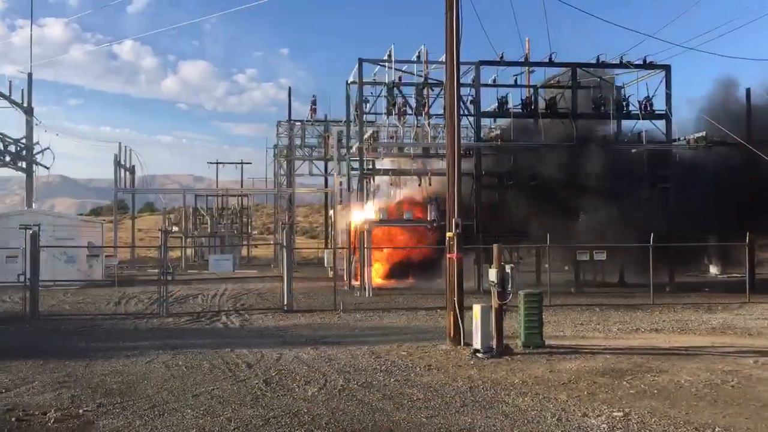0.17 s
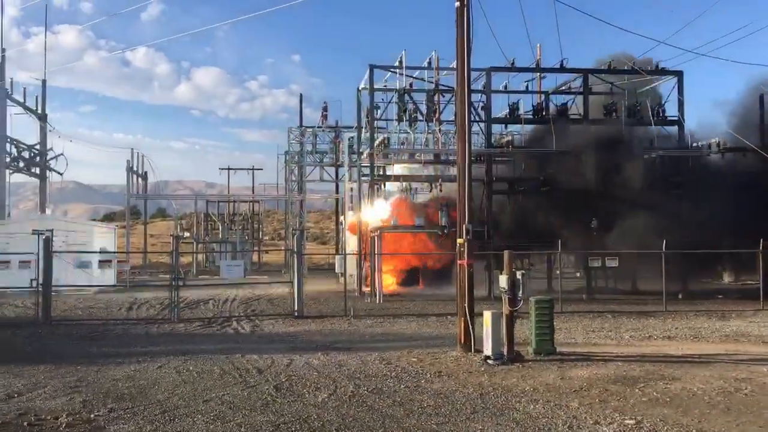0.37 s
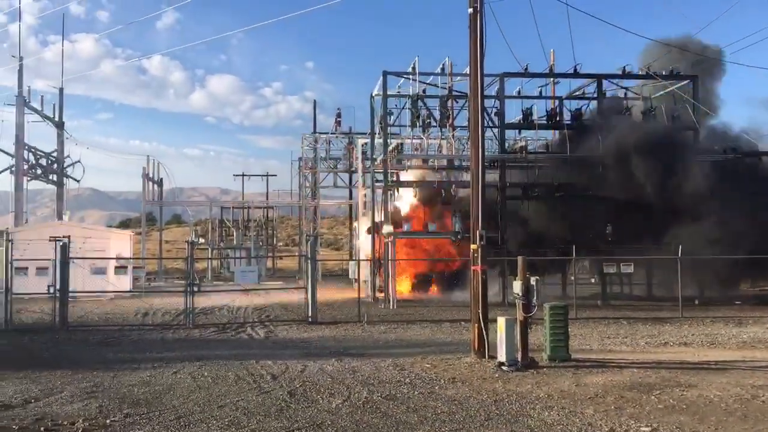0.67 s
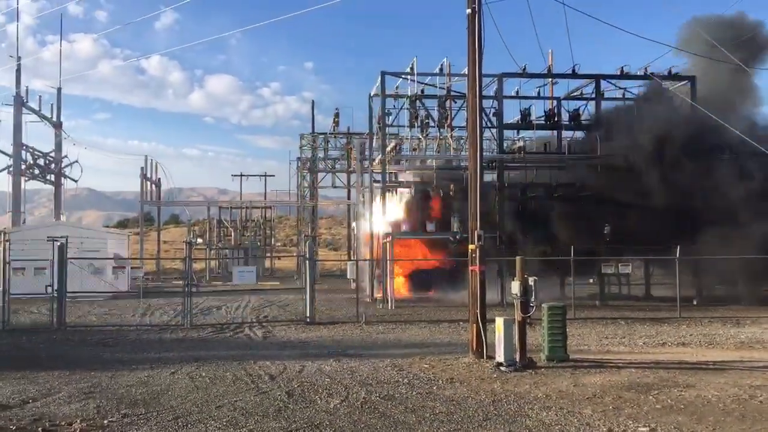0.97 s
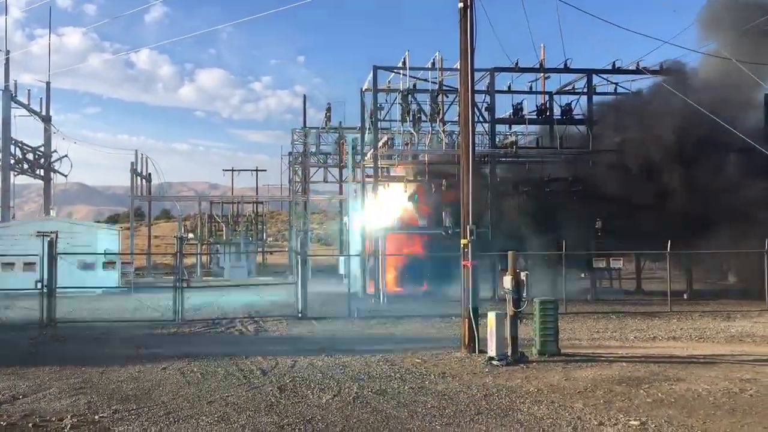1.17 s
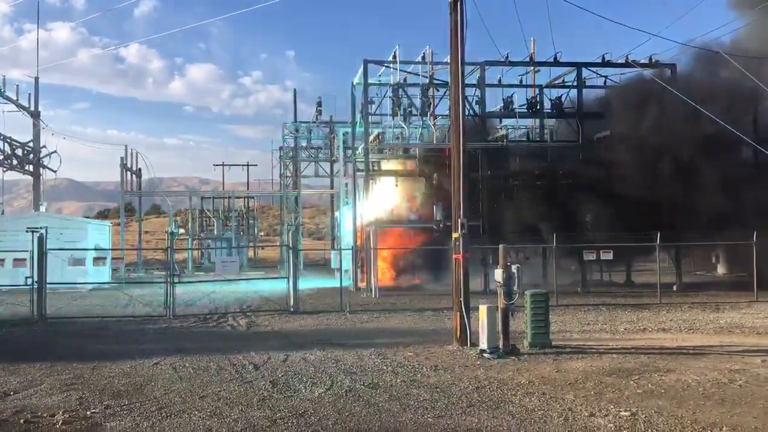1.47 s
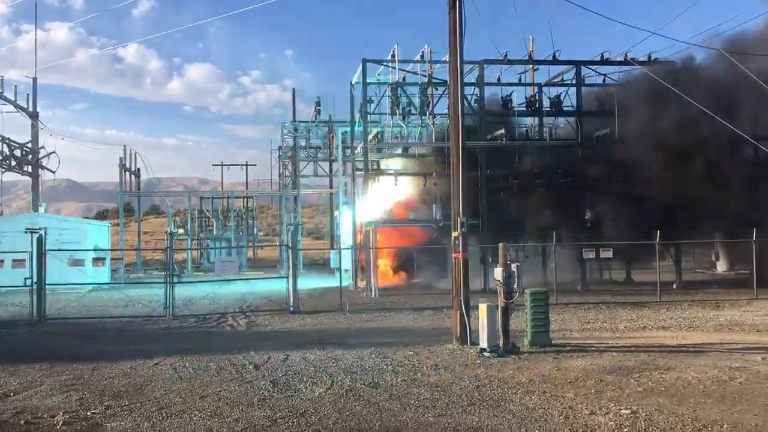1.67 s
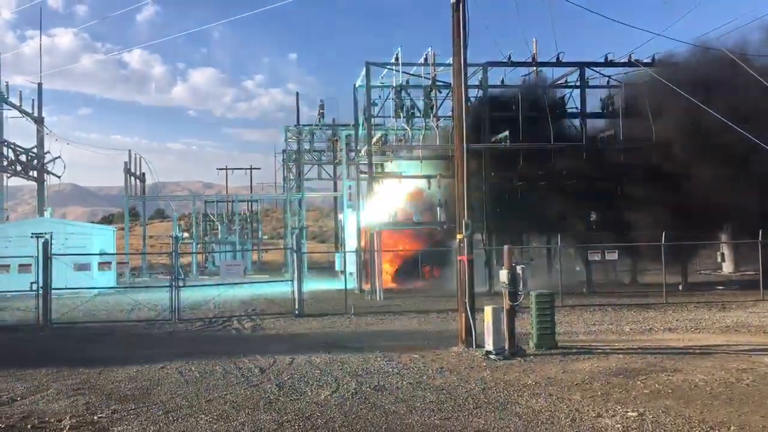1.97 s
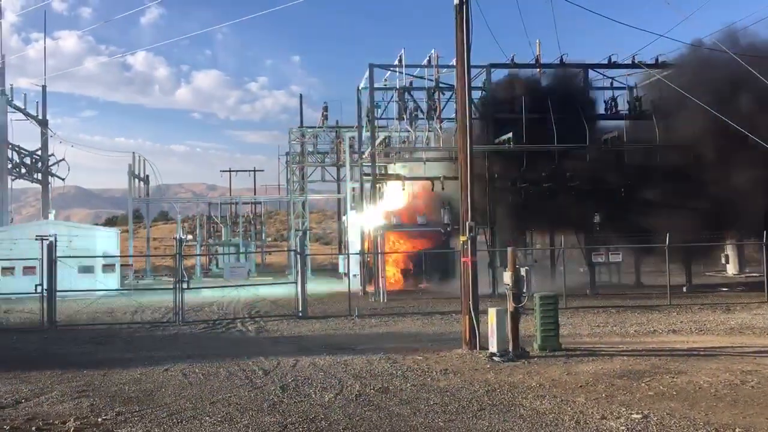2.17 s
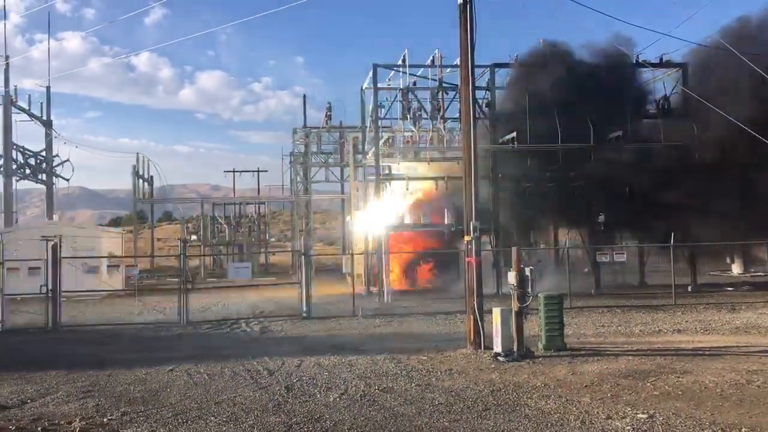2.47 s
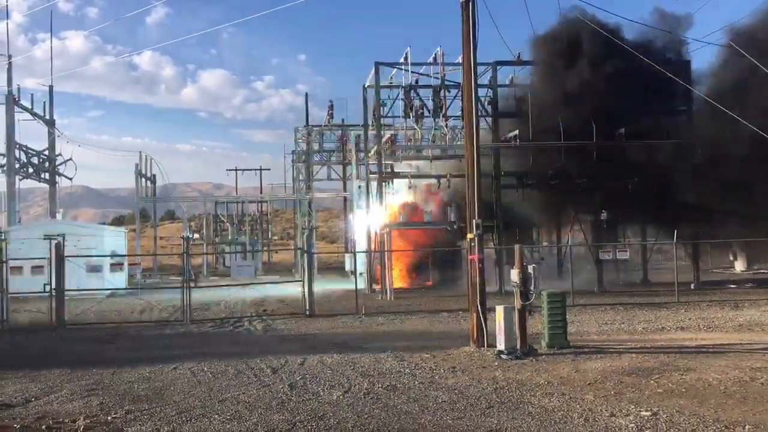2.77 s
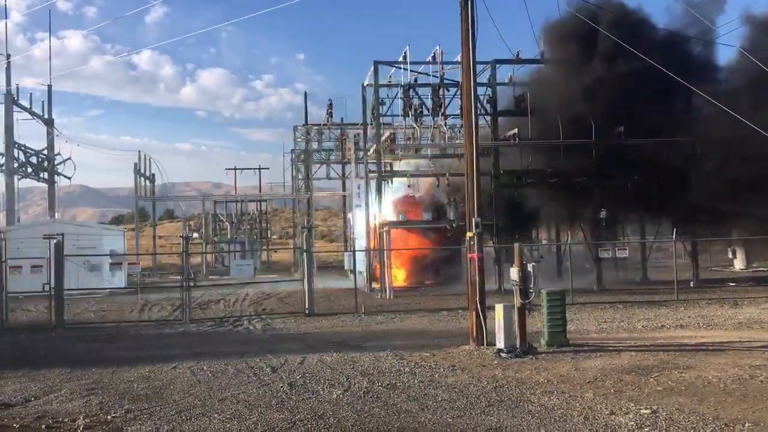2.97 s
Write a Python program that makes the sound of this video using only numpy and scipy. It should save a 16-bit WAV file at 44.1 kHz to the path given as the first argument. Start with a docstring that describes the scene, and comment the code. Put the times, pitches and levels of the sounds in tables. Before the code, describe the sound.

A strong, wavering low electrical hum from a power arc dominates, with gritty sizzle and sharp snapping cracks, densest around the middle; flames rumble behind. Outdoors across a gravel yard, picked up by a phone.

```python
"""A power arc burns in a substation fire, heard across a gravel yard on a phone.
The arc heats the air twice per mains cycle: a strong hum of near-sine overtones, and a noise sizzle that
spits once per pulse. Restrikes add sharp cracks of ragged noise and a few low thumps.
Behind it, filtered noise makes the flames: a low rumble, a hollow roar and short whooshes.
The ground echo leaves a dark gap between rumble and roar."""
import sys
import numpy as np
from scipy import signal
from scipy.fft import rfft, irfft
from scipy.io import wavfile
from scipy.ndimage import uniform_filter1d

SR = 44100
rng = np.random.default_rng(int(sys.argv[2]) if len(sys.argv) > 2 else 0)


def int16_out(signal):
    """Quantize to a 16-bit WAV file."""
    q = np.round(np.clip(np.atleast_2d(signal).T, -1, 1) * 32767)
    wavfile.write(sys.argv[1], SR, q.astype(np.int16))


N = 138033  # length [samples]
ARC_HZ = 119.97  # heating pulses per second, two per mains cycle


def undb(db):
    """Turn decibels into gain."""
    return 10 ** (np.asarray(db) / 20)


def curve(table, col):
    """One column of a table, joined by straight lines in time."""
    rows = np.array(table)
    return np.interp(np.arange(N) / SR, rows[:, 0], rows[:, col])


def unit(x):
    """Scale to rms 1."""
    return x / np.sqrt(np.mean(x ** 2))


def colour(x, points):
    """Causal filter with the given spectrum, built from the cepstrum of the log gain."""
    size = 8192
    rows = np.array(points, float)
    hz = np.maximum(np.arange(size // 2 + 1) * SR / size, 1)
    level_db = np.interp(np.log(hz), np.log(rows[:, 0]), rows[:, 1])
    cepstrum = irfft(level_db * np.log(10) / 20, size)
    # folding the cepstrum onto positive time makes the filter minimum phase
    cepstrum[1:size // 2] *= 2
    cepstrum[size // 2 + 1:] = 0
    impulse = irfft(np.exp(rfft(cepstrum)), size)[:size // 2]
    return signal.fftconvolve(x, impulse)[:N]


def band(x, lo_hz, hi_hz):
    """Band-pass."""
    return signal.sosfilt(signal.butter(2, [lo_hz, hi_hz], "band", fs=SR, output="sos"), x)


def low(x, hz, order=1):
    """Low-pass."""
    return signal.sosfilt(signal.butter(order, hz, fs=SR, output="sos"), x)


def even(x, size):
    """Divide noise by its own rms over a short window of samples, so its level holds steady."""
    return x / np.sqrt(uniform_filter1d(x ** 2, size=size) + 1e-12)


def walk(rate_hz):
    """Random levels held for 1 / rate_hz seconds and smoothed twice, scaled to rms 1."""
    hold = int(SR / rate_hz)
    steps = np.repeat(rng.standard_normal(N // hold + 1), hold)
    return unit(uniform_filter1d(uniform_filter1d(steps, hold), hold)[:N])


def bursts(peaks_s, gains, rise_s, fall_s):
    """Envelope of bursts that swell to their peak time and die away exponentially."""
    marks = np.zeros(N)
    starts = np.clip(((peaks_s - rise_s) * SR).astype(int), 0, N - 1)
    np.add.at(marks, starts, gains)
    t = np.arange(3000) / SR - rise_s
    shape = np.where(t < 0, np.sin(np.pi / 2 * (1 + t / rise_s)) ** 2, np.exp(-t / fall_s))
    return signal.oaconvolve(marks, shape)[:N]


# The fire behind the arc, as it reaches the phone:
# (time [s], rumble level [dB], lower roar level [dB], upper roar level [dB])
FLAME_LEVELS = [(0.04, -30.5, -38, -40), (0.21, -23, -42, -33.5), (0.24, -34, -51, -41),
                (0.36, -27.5, -52, -45), (0.38, -29, -39, -34.5), (0.47, -31.5, -39.5, -44),
                (0.62, -34, -37, -37), (0.81, -26.5, -34.5, -38.5), (0.85, -31, -50, -63),
                (1.01, -29, -40.5, -40.5), (1.31, -35.5, -47, -42.5), (1.46, -30, -39.5, -40),
                (1.89, -25, -36, -35.5), (1.98, -26.5, -42.5, -41), (2.28, -32.5, -38, -42),
                (2.42, -36, -52, -46.5), (2.44, -32.5, -42, -39), (2.54, -33, -46.5, -53),
                (2.72, -28, -44, -32.5), (2.96, -30, -44.5, -60), (3.04, -32, -51, -72),
                (3.07, -25, -48, -33), (3.11, -25.5, -55, -42)]
# Spectrum of the rumble: (frequency [Hz], relative density [dB per Hz])
RUMBLE_SPECTRUM = [(20, -47), (30, -0.5), (40, -20.5), (65, -8.5), (100, -13), (180, 6.5), (230, 2.5),
                   (300, -7.5), (360, -14), (440, -33), (520, -39.5)]
# Spectrum of the roar: (frequency [Hz], relative density [dB per Hz])
ROAR_SPECTRUM = [(380, -28.5), (450, -17.5), (520, -0.5), (700, 0.5), (1150, -2), (1600, -3.5)]
ROAR_EDGES_HZ = (430, 733, 1160)  # lower roar, then upper roar
DEEP_DB, DEEP_HZ = -27.5, 100  # steady deep rumble: level and top edge
FLUTTER_DB = 2  # rms waver of the rumble noise


def flames():
    """Burning oil: a steady deep rumble, a fluttering one above it, and past the dark gap a hollow roar."""
    rumble = colour(undb(FLUTTER_DB * walk(24.05)) * rng.standard_normal(N), RUMBLE_SPECTRUM)
    out = undb(DEEP_DB) * unit(low(rumble, DEEP_HZ, order=3))
    out = out + undb(curve(FLAME_LEVELS, 1)) * unit(band(rumble, DEEP_HZ, 960))
    for k in range(2):
        roar = colour(undb(2.0 * walk(50)) * rng.standard_normal(N), ROAR_SPECTRUM)
        roar = unit(band(roar, ROAR_EDGES_HZ[k], ROAR_EDGES_HZ[k + 1]))
        out = out + undb(curve(FLAME_LEVELS, k + 2)) * roar
    return out


# Whooshes in the flames: (centre time [s], half length [s], pitch [Hz], level [dB])
WHOOSHES = [(.63, .09, 790, -33), (1.71, .03, 950, -35), (2.08, .03, 1380, -36), (2.23, .035, 690, -31),
            (2.29, .02, 600, -33)]
WHOOSH_WIDTH_HZ = 280


def gusts():
    """Short hollow whooshes, each a narrow breathy band that swells and fades."""
    t = np.arange(N) / SR
    noise, out = rng.standard_normal(N), 0
    for centre_s, half_s, hz, db in WHOOSHES:
        air = even(band(noise, hz - WHOOSH_WIDTH_HZ / 2, hz + WHOOSH_WIDTH_HZ / 2), 800)
        swell = np.exp(-((t - centre_s) / half_s) ** 2)
        out = out + undb(db) * swell * air
    return out


YARD_T60_S, YARD_DB = 1, -12  # decay rate of the tail, and its total energy against the direct sound


def yard(x):
    """Steel frames and sheds scatter the arc into a smooth tail, cut off after half a second."""
    t = np.arange(SR // 2) / SR
    echo = rng.standard_normal(len(t)) * undb(-60 * t / YARD_T60_S)
    echo = echo / np.sqrt(np.sum(echo ** 2))
    return x + undb(YARD_DB) * signal.fftconvolve(x, echo)[:N]


# Heavy restrikes across the yard: (crest time [s], peak level [dB])
THUMP_CRESTS = [(0.3862, -12), (1.017, -16), (1.8312, -22), (2.8116, -13.5)]
THUMP_HZ, THUMP_S = 193, 0.0049  # pitch, and time from crest to 1/e of the envelope


def thumps():
    """A few heavy restrikes push out one low pressure swing each."""
    t = np.arange(N) / SR
    out = 0
    for crest_s, db in THUMP_CRESTS:
        envelope = np.exp(-((t - crest_s) / THUMP_S) ** 2)
        out = out + undb(db) * envelope * np.cos(2 * np.pi * THUMP_HZ * (t - crest_s))
    return out


# Restrikes of the arc: (peak time [s], middle level [dB], treble level [dB], body level [dB])
CRACKS = [(0.0934, -24, -34, -31), (0.1019, -24, -33, -31), (0.2019, -25, -35, -23),
          (0.3413, -25, -39, -27), (0.3518, -26, -39, -28), (0.3833, -19, -33, -22),
          (0.4065, -21, -33, -28), (0.434, -25, -36, -29), (0.5823, -30, -32, -27), (0.7501, -25, -40, -35),
          (0.7999, -25, -35, -31), (0.9266, -26, -38, -32), (0.9483, -25, -40, -39),
          (1.0155, -25, -32, -32), (1.213, -26, -32, -33), (1.2541, -23, -35, -36), (1.2786, -25, -34, -33),
          (1.3023, -22, -38, -40), (1.3316, -24, -38, -36), (1.3674, -22, -31, -33),
          (1.4023, -23, -30, -32), (1.4158, -22, -26, -35), (1.4433, -23, -31, -33),
          (1.4503, -20, -28, -28), (1.4768, -19, -22, -28), (1.4915, -20, -27, -28),
          (1.4988, -25, -31, -26), (1.535, -17, -26, -25), (1.5422, -23, -28, -31), (1.5512, -18, -27, -29),
          (1.5678, -17, -28, -29), (1.575, -23, -31, -30), (1.5842, -26, -28, -33), (1.5927, -25, -29, -31),
          (1.602, -24, -32, -31), (1.6164, -25, -36, -29), (1.643, -24, -35, -28), (1.7179, -25, -33, -27),
          (1.7348, -26, -33, -28), (1.7766, -25, -34, -30), (1.8346, -24, -34, -25),
          (1.8423, -21, -32, -29), (1.8845, -25, -30, -30), (1.9017, -25, -32, -23),
          (1.9846, -24, -40, -33), (2.0172, -22, -31, -33), (2.1087, -24, -39, -29),
          (2.2022, -23, -32, -29), (2.21, -23, -37, -31), (2.2705, -24, -35, -29), (2.2778, -25, -35, -28),
          (2.4436, -24, -38, -30), (2.5671, -29, -31, -39), (2.6012, -27, -36, -28),
          (2.6757, -24, -33, -25), (2.6856, -23, -34, -36), (2.701, -22, -27, -28), (2.7248, -19, -29, -22),
          (2.7498, -24, -32, -26), (2.8476, -29, -33, -35), (3.0681, -30, -33, -32),
          (3.0768, -28, -32, -22), (3.116, -25, -36, -26)]
# Spectrum of the arc noise, shared with the sizzle: (frequency [Hz], relative density [dB per Hz])
ARC_SPECTRUM = [(260, -49.5), (450, -9), (478, -6.5), (555, -21.5), (607, -6), (964, -7.5), (1170, -4.5),
                (2260, -4.5), (2960, -7), (3230, -5.5), (4910, -15), (6430, -11), (7810, -23.5),
                (9070, -21), (10500, -28), (12400, -28), (16000, -39)]
CRACK_RISE_S, CRACK_FALL_S = .0011, .0022
CRACK_TAIL_S, CRACK_TAIL_DB = 0.0038, -15  # slower second decay, level against the burst
CRACK_BANDS_HZ = [(1000, 5000), (5000, 15500), (450, 1000)]  # middle, treble, body


def cracks():
    """The arc restrikes: short ragged noise bursts in three bands, each with a fainter, slower tail."""
    rows = np.array(CRACKS)
    noise, out = colour(rng.standard_normal(N), ARC_SPECTRUM), 0
    for col, (lo_hz, hi_hz) in enumerate(CRACK_BANDS_HZ):
        gains = undb(rows[:, col + 1])
        burst = bursts(rows[:, 0], gains, CRACK_RISE_S, CRACK_FALL_S)
        tail = bursts(rows[:, 0], gains, CRACK_RISE_S, CRACK_TAIL_S)
        grit = even(band(noise, lo_hz, hi_hz), 200)  # even, so each crack bites
        out = out + (burst + undb(CRACK_TAIL_DB) * tail) * grit
    return out


# Sizzle of the arc before the yard echo: (time [s], level below the treble [dB], treble level [dB])
SIZZLE_LEVELS = [(0.04, -39.5, -43), (0.09, -35, -36.5), (0.15, -30.5, -41), (0.18, -45, -47),
                 (0.2, -30, -39.5), (0.25, -46, -48), (0.35, -34, -46), (0.37, -49, -44), (0.38, -28, -39),
                 (0.48, -45.5, -48.5), (0.51, -39.5, -42.5), (0.91, -36, -49), (0.95, -33, -43),
                 (0.98, -38, -47), (1.28, -37, -35.5), (1.36, -36, -48), (1.36, -31.5, -28.5),
                 (1.39, -39, -42.5), (1.41, -29.5, -31.5), (1.47, -30.5, -39), (1.48, -30.5, -27),
                 (1.53, -36.5, -49), (1.54, -38.5, -27.5), (1.67, -37, -55), (1.73, -31, -33.5),
                 (1.74, -40, -41), (1.9, -30, -38), (1.96, -41.5, -47), (2.04, -34.5, -42),
                 (2.14, -38.5, -43.5), (2.22, -32.5, -36), (2.42, -41.5, -50.5), (2.44, -35, -44),
                 (2.63, -40.5, -45.5), (2.7, -33.5, -33), (2.78, -38.5, -45.5), (3.0, -42, -47.5),
                 (3.13, -33.5, -39)]
SPIT_LAG_S, SPIT_WANDER_S = 0.00022, 0.0008  # peak after the pulse clock, and its rms scatter
SPIT_RISE_S, SPIT_FALL_S = 0.0014, .0034
SPIT_SCATTER_DB, SPIT_CAP = 3.5, 2  # dB per unit of the random strength, and the cap on that strength
GRIT_DB = 3  # rms waver of the spitting noise
STEADY_DB, STEADY_TOP_HZ = -2.5, 5800  # the wash: noise level before its low-pass, and the cutoff
BRIGHT_HZ = 4850  # split between body and treble


def sizzle():
    """Gritty hiss that spits once per arc pulse, each spit with its own strength and timing, over a duller wash."""
    count = int(N / SR * ARC_HZ) + 1
    wander = SPIT_WANDER_S * rng.standard_normal(count)
    strength = np.minimum(rng.exponential(size=count), SPIT_CAP)
    times = np.arange(count) / ARC_HZ + SPIT_LAG_S + wander
    spits = bursts(times, undb(SPIT_SCATTER_DB * (strength - 0.5)), SPIT_RISE_S, SPIT_FALL_S)
    wash = undb(STEADY_DB) * low(rng.standard_normal(N), STEADY_TOP_HZ)
    gritty = spits * undb(GRIT_DB * walk(900)) * rng.standard_normal(N)
    hiss = colour(gritty + wash, ARC_SPECTRUM)
    body = low(hiss, BRIGHT_HZ)
    treble = hiss - body
    return undb(curve(SIZZLE_LEVELS, 1)) * unit(body) + undb(curve(SIZZLE_LEVELS, 2)) * unit(treble)


# Strength of the arc's fundamental: (time [s], rms level [dB])
HUM_LEVELS = [(0.04, -13), (0.06, -17), (0.215, -12.5), (0.235, -25.5), (0.3, -18.5), (0.35, -24.5),
              (0.38, -17), (0.47, -21.5), (0.53, -16.5), (0.68, -21), (0.93, -18), (0.99, -14.5),
              (1.09, -17), (1.37, -15), (1.46, -10.5), (1.51, -15.5), (1.62, -15), (1.91, -11.5),
              (1.96, -15.5), (2.01, -11.5), (2.11, -13.5), (2.3, -12), (2.325, -18.5), (2.44, -13.5),
              (2.53, -18), (2.677, -10.5), (2.692, -18), (2.78, -22), (2.88, -16.5), (2.92, -25.5),
              (2.96, -18), (3.08, -15.5), (3.13, -17)]
# Strength of its octave overtone: (time [s], rms level [dB])
OCTAVE_LEVELS = [(0.04, -29), (0.09, -27.5), (0.2, -35), (0.78, -27), (1.05, -35.5), (1.2, -47.5),
                 (1.43, -35.5), (1.86, -32.5), (1.92, -44), (2.0, -29), (2.07, -36.5), (2.76, -46.5),
                 (2.78, -37), (3.13, -45)]
# Upper overtones: (frequency [Hz], level against the octave overtone [dB])
UPPER_OVERTONES = [(360, -18), (480, -18), (600, -17), (720, -17), (840, -19)]
HUM_LAG_S, OCTAVE_LAG_S = .0028, .0011  # crest after the mains clock
HUM_JITTER_DB, HUM_DRIFT_S = 1.26, 0.00023  # rms waver of size and of timing


def hum():
    """Heating pulses of the arc: a near sine whose size and timing waver, with overtones."""
    t = np.arange(N) / SR + HUM_DRIFT_S * walk(8.07)

    def tone(hz, lag_s, db):
        """A cosine at an rms level, its crest delayed by the lag."""
        return np.sqrt(2) * undb(db) * np.cos(2 * np.pi * hz * (t - lag_s))

    octave_db = curve(OCTAVE_LEVELS, 1)
    out = tone(ARC_HZ, HUM_LAG_S, curve(HUM_LEVELS, 1) + HUM_JITTER_DB * walk(60))
    out = out + tone(2 * ARC_HZ, OCTAVE_LAG_S, octave_db)
    for hz, db in UPPER_OVERTONES:
        out = out + tone(hz, 0.00039 * walk(14), db + octave_db + 4.0 * walk(8.03))
    return out


START_S, OPENING_S = .036, 0.0012  # silence before the sound, and its fade-in


def scene():
    """Arc and fire together at the phone; only sizzle and cracks carry the yard echo."""
    opening = np.clip((np.arange(N) / SR - START_S) / OPENING_S, 0, 1)
    arc = hum() + thumps() + yard(sizzle() + cracks())
    fire = flames() + gusts()
    return (opening * (arc + fire))[None]


MIC_LOW_HZ, TOP_HZ = 43, 16150


def record(dry):
    """The phone microphone loses the deepest bass and cuts the top."""
    dry = signal.sosfilt(signal.butter(4, MIC_LOW_HZ, "high", fs=SR, output="sos"), dry)
    return signal.sosfilt(signal.ellip(10, .2, 80, TOP_HZ, fs=SR, output="sos"), dry)


dry = scene()
out = record(dry)
int16_out(out)
```